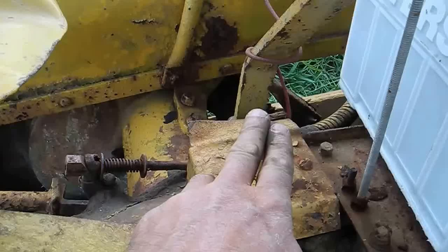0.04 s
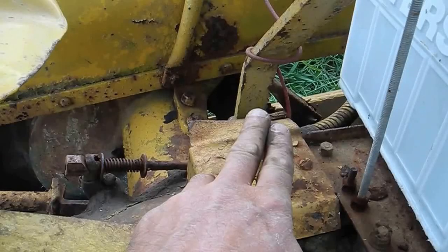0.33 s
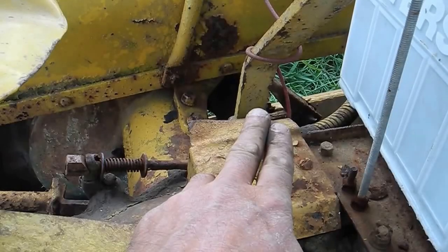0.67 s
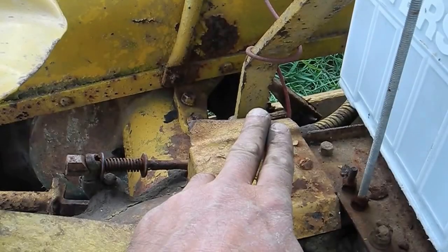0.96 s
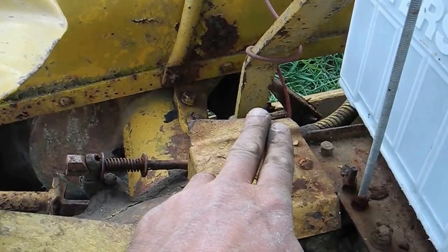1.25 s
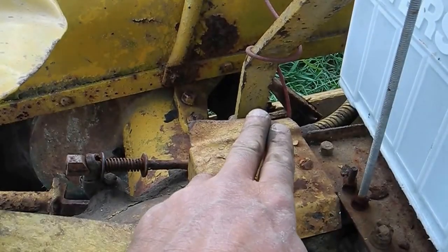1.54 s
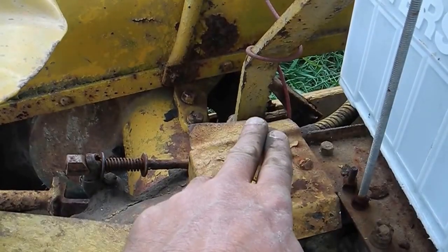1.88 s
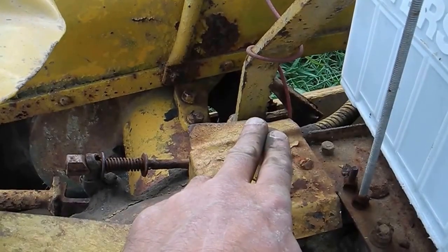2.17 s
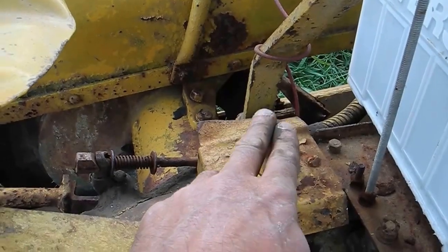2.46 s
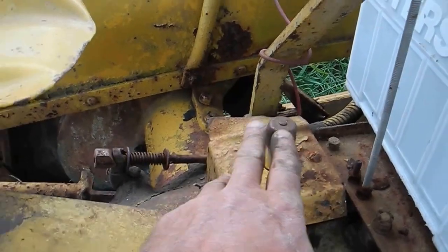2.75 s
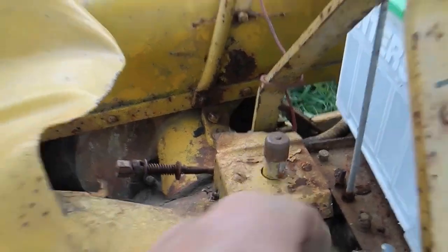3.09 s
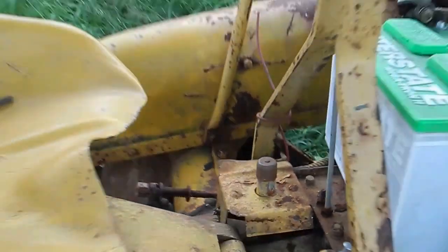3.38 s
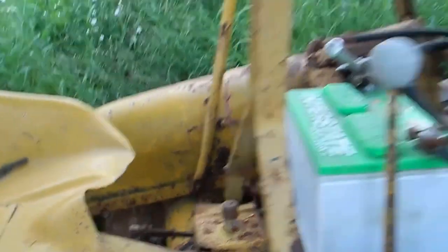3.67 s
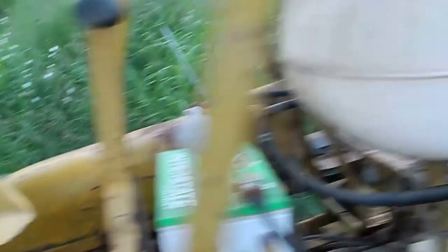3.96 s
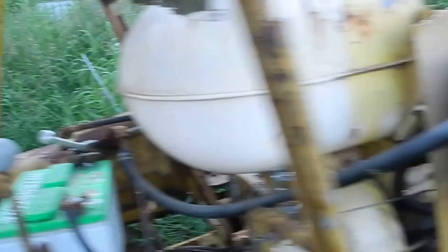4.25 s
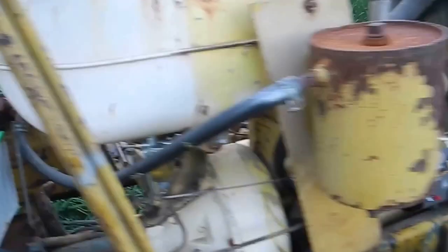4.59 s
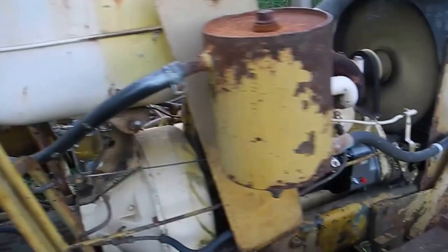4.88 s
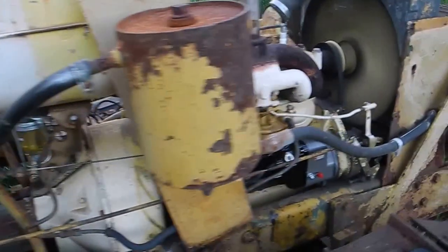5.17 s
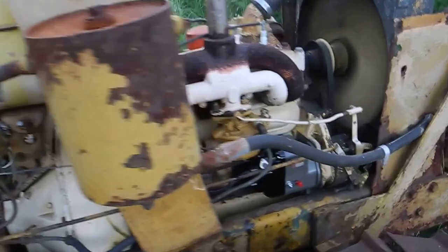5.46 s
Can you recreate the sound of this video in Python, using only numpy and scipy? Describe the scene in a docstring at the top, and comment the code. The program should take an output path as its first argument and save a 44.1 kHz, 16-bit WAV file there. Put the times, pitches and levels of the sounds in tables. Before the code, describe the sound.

After faint birdsong in a quiet yard, an old tractor cranks briefly, fires up and runs with a lumpy, clattering chug.

```python
"""A small bird chirps over the faint rush of a quiet yard. Close by, a hand presses the starter switch
of an old tractor: the plunger knocks and pings, and the contact snaps shut. The starter gears grind
through the iron casing, the compression strokes chuff, and the engine catches. The starter rattles
down while the exhaust settles to a lumpy chug, with runs of hard firings between soft ones,
over a droning pipe, clattering valve gear and hissing gas."""
import sys
import numpy as np
from scipy import signal
from scipy.fft import rfft, irfft, next_fast_len
from scipy.io import wavfile
from scipy.ndimage import uniform_filter1d

SR = 44100
rng = np.random.default_rng(int(sys.argv[2]) if len(sys.argv) > 2 else 0)


def master(y):
    """Save y as 16-bit WAV."""
    cut = np.clip(np.atleast_2d(y).T, -1, 1)
    pcm = np.round(cut * 32767)  # scale
    wavfile.write(sys.argv[1], SR, pcm.astype(np.int16))


N = 248283
TIME = np.arange(N) / SR
PADDED = next_fast_len(N + SR // 4, True)
HZ = np.fft.rfftfreq(PADDED, 1 / SR)


def amp(db):
    return 10 ** (np.asarray(db) / 20)


def unit_rms(x):
    return x / np.sqrt(np.mean(x ** 2) + 1e-20)


def spectrum(points):
    """Values joined by straight lines along log frequency."""
    hz, value = np.transpose(points)
    return np.interp(np.log(HZ + 1), np.log(hz + 1), value)


def curve(rows, column=1):
    """One column of a table, joined by straight lines in time."""
    rows = np.array(rows)
    return np.interp(TIME, rows[:, 0], rows[:, column])


def fader(rows, fade=0.026):
    """Levels in dB as a gain that fades to nothing outside their span."""
    outside = np.maximum(rows[0][0] - TIME, 0) + np.maximum(TIME - rows[-1][0], 0)
    return amp(curve(rows)) * np.exp(-(outside / fade) ** 2)


def spell(start, end, start_db, end_db, attack, release):
    """A gain that rises, slides from one level to another, and dies away."""
    outside = np.maximum(start - TIME, 0) / attack + np.maximum(TIME - end, 0) / release
    return amp(np.interp(TIME, [start, end], [start_db, end_db])) * np.exp(-outside ** 2)


def puff(rise, decay):
    """An envelope that swells to 1 and dies away."""
    t = TIME[:SR // 3]
    shape = (1 - np.exp(-(t / rise) ** 2)) * np.exp(-t / decay)
    return shape / shape.max()


def noise():
    """Two unrelated white noises."""
    return rng.standard_normal((2, N))


def wander(rate_hz):
    """Smooth random drift of rms 1."""
    drift = rfft(rng.standard_normal(PADDED)) / (1 + (HZ / rate_hz) ** 4)
    return unit_rms(irfft(drift, PADDED)[:N])


def strike(times, gains, shape):
    """A copy of one shape at each time, scaled by its gain."""
    out = np.zeros(N + SR)
    for s, gain in zip(times, np.atleast_1d(gains)):
        start = round(s * SR)
        out[start:start + len(shape)] += gain * shape
    return out[:N]


def bursts(times, db, shape):
    """Puffs of noise whose powers add where they overlap."""
    return np.sqrt(strike(times, amp(db) ** 2, shape ** 2)) * noise()


def scatter(x, t60):
    """Dense reflections, different left and right."""
    t = TIME[:SR // 2]
    tail = rng.standard_normal((2, len(t))) * amp(-60 * t / t60)
    flat = irfft(np.exp(1j * np.angle(rfft(tail))), len(t)) * amp(-20 * t / t60)
    return signal.fftconvolve(x[None], flat / np.linalg.norm(flat[0]), axes=1)[:, :N]


# The ring of the iron casing. Each row: frequency in Hz, width in Hz, lift in dB when iron is 1.
CASING_MODES = [(236, 24, 5.5), (291.3, 17, 4.5), (498.5, 28, 7.5), (580.7, 26.5, 10), (688, 77, 7),
                (1084, 21, 4.5), (1393, 40, 3.5), (1637, 22, 5.5), (1776, 110, 3), (2078, 26, 7.5),
                (2200, 68, 4), (2720, 27, 1.5)]
# Stereo width, wide open in the treble. Each row: frequency in Hz, left-right correlation.
STEREO_LIKENESS = [(60, 0.4), (250, 0.86), (600, 0.83), (1100, 0.52), (2000, 0), (5000, -0.05), (16000, 0)]


def radiate(x, colour, iron=0, ripple_db=3.5, ripple_hz=70):
    """Make two unrelated signals a stereo pair with this EQ and the casing's ring, at equal power."""
    ring_db = sum(db / (1 + (2 * (HZ - hz) / width) ** 2) for hz, width, db in CASING_MODES)
    # a fine random ripple gives the treble a faint metallic ring
    ripple = np.interp(HZ / ripple_hz, np.arange(1024), rng.standard_normal(1024)) * HZ / (HZ + 1500)
    gain = unit_rms(amp(spectrum(colour) + iron * ring_db + ripple_db * ripple))
    one_sided = np.sign(PADDED / 2 - np.arange(PADDED)) + (np.arange(PADDED) > 0)
    causal = np.exp(rfft(irfft(np.log(gain + 1e-6), PADDED) * one_sided))  # rings only after the blow
    likeness = spectrum(STEREO_LIKENESS)
    a, b = rfft(x, PADDED) * causal
    mid, side = a * np.sqrt((1 + likeness) / 2), b * np.sqrt((1 - likeness) / 2)
    return irfft(np.array([mid + side, mid - side]), PADDED)[:, :N]


# The dark bed of outdoor air. Each row: frequency in Hz, relative level in dB.
AIR_EQ = [(15, -36), (25, -8), (70, 3.5), (145, -1), (695, -9.5), (840, -12), (1330, -13.5), (1440, -15),
          (3160, -17), (3430, -20.5), (4870, -17.5), (6050, -26), (12500, -27.5), (16000, -33)]


def yard(start=0.1, level_db=-54.5):
    """A faint, barely wavering open-air rush."""
    fade_in = np.clip((TIME - start) / 0.0089, 0, 1)
    return amp(level_db) * radiate(noise(), AIR_EQ, ripple_db=1.5) * amp(0.23 * wander(12)) * fade_in


# Chirps in twos and threes. Each row: start in seconds, note count, level in dB, top pitch in Hz.
CHIRPS = [(.222, 3, -53, 5130), (.429, 3, -55, 4850), (.618, 2, -63, 5270), (1.187, 3, -52.5, 5080),
          (1.359, 2, -54.5, 4810)]
# One buzzy note. Each row: time in seconds, level in dB, pitch in Hz.
BUZZY_NOTE = [(.87, -85, 5600), (.9, -54, 5600), (.94, -61, 5750), (.965, -54.5, 5800), (1.01, -58, 5470),
              (1.05, -67, 5900), (1.1, -63, 5800), (1.15, -80, 5900)]


def bird(note_s=.028, spacing_s=.053, fall=0.11, buzz_spread_hz=330):
    """Short falling notes and a buzz, blurred by leaves and echoed by the trees."""
    song = np.zeros(N)
    waver = 1 + .012 * wander(150)
    for start, count, db, top_hz in CHIRPS:
        note, since = np.divmod(TIME - start, spacing_s)
        progress = np.minimum(since / note_s, 1) * (note >= 0) * (note < count)
        pitch = top_hz * waver * (1 - fall * progress ** 3)
        song += amp(db) * np.sin(np.pi * progress) * np.sin(2 * np.pi * np.cumsum(pitch) / SR)
    buzz_hz = curve(BUZZY_NOTE, column=2) + buzz_spread_hz * wander(390)
    song += fader(BUZZY_NOTE) * np.sin(2 * np.pi * np.cumsum(buzz_hz) / SR)
    leaves = amp(-0.5) * scatter(song, 0.046)
    trees = amp(-6) * scatter(song, 0.41)
    return amp(-9) * song + leaves + trees


# Clicks and scrapes. Each row: start in seconds, level in dB, decay in seconds, brightness from 0 to 1.
SWITCH_HITS = [(1.49, -47, .02, .1), (1.554, -35.5, 0.01, 0.05), (1.576, -47.5, 0.069, 0.27),
               (1.634, -52.5, 0.063, .2), (1.68, -43, 0.049, 0.6), (1.715, -50, 0.047, 0),
               (1.751, -31, 0.0099, 0.8), (1.7636, -18.5, 0.0034, 0.8), (1.781, -18.5, 0.01, 0.4)]
# The ping of plunger and spring. Each row: pitch in Hz, relative level in dB, t60 in seconds.
PLUNGER_MODES = [(1840, -6, 0.07), (2120, -3.5, 0.11), (3930, -14, 0.12), (4210, -8, 0.097),
                 (5330, -12, 0.046), (6970, -20.5, .08)]


def switch(ping_db=-7.5):
    """The plunger knocks, pings and scrapes down until the contact snaps shut."""
    hits = [(strike([s], amp(db), puff(0.0013, decay)), bright) for s, db, decay, bright in SWITCH_HITS]
    knock = sum(hit * np.sqrt(1 - bright) for hit, bright in hits)
    snap = sum(hit * np.sqrt(bright) for hit, bright in hits)
    knock_eq = [(60, -6), (300, -2.5), (750, -0.5), (1200, -1.5), (2200, -5.5), (5000, -32), (16000, -43)]
    snap_eq = [(300, -11), (2000, 0), (4200, 7), (5400, 1), (7000, 0), (16000, -4)]
    dull = radiate(knock * noise(), knock_eq, iron=0.72)
    t = TIME[:SR // 4]
    modes = sum(amp(db - 60 * t / t60) * np.sin(2 * np.pi * hz * t) for hz, db, t60 in PLUNGER_MODES)
    times, hit_db = np.transpose(SWITCH_HITS)[:2]
    ping = strike(times, amp(hit_db + ping_db), modes)
    return dull + ping + radiate(snap * noise(), snap_eq, iron=0.56)


# The pitch of the gear mesh. Each row: time in seconds, teeth per second.
TOOTH_RATE = [(1.75, 149.8), (1.85, 260.8), (2.1, 245.1), (2.4, 354.8), (2.7, 340.2), (3.0, 292.2),
              (3.3, 249.7), (4.1, 158.6)]


def gears(strokes, jitter=.09, uneven_db=3.5, throb=0.036):
    """Worn teeth strike unevenly and rub; each compression stroke leans on them."""
    teeth = np.cumsum(curve(TOOTH_RATE) * (1 + jitter * wander(80))) / SR
    hits = (np.diff(np.floor(teeth), prepend=0) > 0) * amp(uneven_db * rng.standard_normal(N))
    mesh = unit_rms(scatter(hits, 0.039))
    return unit_rms(mesh + noise()) * (1 + throb * np.cos(2 * np.pi * strokes))


# The grind under load, one row, and the rattles as the engine outruns the starter.
# Each row: start and end in seconds, opening and closing level in dB.
GRIND_SPELL = (1.77, 2.076, -12.5, -17.5)
RATTLE_SPELLS = [(2.136, 2.226, -22, -21), (2.423, 2.827, -26.5, -18), (2.916, 3.25, -21.5, -16.5),
                 (3.33, 3.62, -23.5, -22.5), (4.02, 4.12, -27, -24)]
# The tone of grind and rattle. Each row: frequency in Hz, relative level in dB.
GRIND_EQ = [(40, -42), (80, -13.5), (150, -13.5), (240, -11.5), (380, -3.5), (520, -4.5), (720, -2),
            (830, -6), (1100, -5.5), (1600, -7.5), (2500, -11), (5000, -29.5), (8500, -31.5), (11500, -43),
            (16000, -59)]
RATTLE_EQ = [(110, -24.5), (190, -8), (280, -6), (370, -6), (537, -10.5), (589, -6.5), (807, -8.5),
             (1360, -4.5), (1700, -9), (2120, -9), (4370, -22), (11900, -39.5), (16000, -83)]
# Fader rides for the casing's growl and the motor's low whirr. Each row: time in seconds, level in dB.
GROWL_RIDE = [(1.778, -34), (1.8, -20.5), (1.85, -16), (1.9, -27), (1.93, -17.5), (1.98, -31),
              (2.06, -21.5), (2.11, -27)]
WHIRR_RIDE = [(1.79, -30.5), (1.84, -26), (1.865, -22), (1.97, -23.5), (2.05, -26.5), (2.2, -25),
              (2.35, -38)]


def starter(strokes):
    """The pinion grinds, the casing growls, the motor whirrs up; then the overrunning gears rattle."""
    growl_eq = [(380, -26.5), (510, 0.5), (620, -3.5), (715, 7), (770, 1), (880, -34)]
    whirr_eq = [(110, -29), (190, -6.5), (250, -1), (305, -1), (370, -9), (600, -45)]
    grinding = spell(*GRIND_SPELL, attack=0.0081, release=0.022)
    grind = grinding * radiate(gears(strokes), GRIND_EQ, iron=0.6)
    growl = fader(GROWL_RIDE) * radiate(gears(strokes), growl_eq, iron=0.97)
    whirr = amp(-1.5) * fader(WHIRR_RIDE) * radiate(gears(strokes), whirr_eq, iron=0.72)
    rattling = np.max([spell(*row, attack=0.044, release=0.052) for row in RATTLE_SPELLS], axis=0)
    rattle = rattling * radiate(gears(strokes), RATTLE_EQ, iron=1.3)
    return grind + growl + whirr + rattle


# Low chuffs as the starter turns the engine over. Each row: time in seconds, level in dB.
UNFIRED_STROKES = [(1.925, -32), (2.06, -29)]


def chuffs(chuff_hz=62, rise=0.0053, decay=0.014):
    """Each unfired compression stroke pushes a dull puff out of the pipe."""
    times, db = np.transpose(UNFIRED_STROKES)
    swell = puff(rise, decay)
    return strike(times - rise, amp(db), swell * np.sin(2 * np.pi * chuff_hz * TIME[:len(swell)]))


# The tempo of the chug. Each row: time in seconds, firings per second.
FIRING_RATE = [(2.13, 17), (2.33, 27), (2.55, 23), (2.85, 23), (3.1, 20.5), (3.35, 24.5), (4.0, 25.6),
               (4.5, 27.3), (5.15, 27.6), (5.35, 26), (5.63, 27.8)]
# Runs of hard firings. Each row: start in seconds, firing count, then in dB the thump level,
# the bark level, the thump's sag at both ends and the growth over the run.
HARD_RUNS = [(2.132, 4, -11.5, -24, 8, -1), (2.316, 3, -8, -27.5, 5, 2), (2.772, 1, -12, -30, 0, 0),
             (2.858, 1, -10.5, -21, 0, 0), (2.992, 1, -14, -19, 0.5, 0), (3.186, 5, -13, -21.5, -3, 4),
             (3.443, 1, -9.5, -29, 2, 1), (3.522, 4, -5.5, -19, 3.5, 2), (3.678, 3, -8.5, -26, -1, 5),
             (3.878, 2, -6, -25, 1, 2.5), (4.076, 5, -5.5, -21, 5, 1), (4.453, 5, -5.5, -17.5, 5.5, -2),
             (4.672, 1, -6.5, -26, 0, 0), (4.745, 5, -2.5, -19, 14, -1.5), (5.074, 6, -10, -28, -3.5, -1.5),
             (5.366, 1, -13, -23, 2, 0), (5.446, 4, -13, -24, -3, 7)]


def crank():
    """The running count of strokes, nudged so that runs start a whole number of strokes apart."""
    starts = np.array(HARD_RUNS)[:, 0]
    free = np.cumsum(curve(FIRING_RATE)) / SR
    at_start = np.interp(starts, TIME, free)
    whole = np.concatenate([[0], np.cumsum(np.round(np.diff(at_start)))])
    return free + np.interp(TIME, starts, whole - at_start)


def firings(strokes, soft_thump_db=-25, soft_bark_db=-26, soft_spread_db=2, hard_spread_db=.7):
    """Time, thump dB, bark dB and hardness (0 or 1) of every firing: soft, except in the runs."""
    times = np.interp(np.arange(int(strokes[-1]) + 1), strokes, TIME)
    db = np.zeros((len(times), 2)) + [soft_thump_db, soft_bark_db]
    hard = np.zeros(len(times))
    for start, count, thump_db, bark_db, sag_db, growth_db in HARD_RUNS:
        run = abs(times - start).argmin() + np.arange(count)
        place = (run - run.mean()) / max(count - 1, 1)  # from minus to plus one half
        db[run, 0] = thump_db + growth_db * place - sag_db * (2 * place) ** 2
        db[run, 1] = bark_db + growth_db * place
        hard[run] = 1
    db += np.where(hard, hard_spread_db, soft_spread_db)[:, None] * rng.standard_normal(db.shape)
    return times, db[:, 0], db[:, 1], hard


# Accents: firings that go off with a sharp bang.
# Each row: time in seconds, then muffler bark, iron knock and gas crack levels in dB.
SHARP_BANGS = [(2.132, -28, -14.5, -31), (2.19, -16, -18, -27.5), (2.234, -17, -13, -29.5),
               (2.316, -17, -26.5, -37), (2.772, -32, -20, -33.5), (3.272, -17, -24, -34),
               (3.637, -20, -24, -29.5), (3.758, -22.5, -36, -43), (4.077, -16.5, -36, -35),
               (4.115, -23, -31, -28), (4.19, -30, -31, -27.5), (4.491, -21, -27, -32.5),
               (4.528, -23, -26, -35), (4.783, -19, -24, -48), (4.817, -21, -25, -43),
               (4.852, -25, -17, -38), (5.074, -13.5, -20.5, -38), (5.145, -18.5, -21.5, -38),
               (5.22, -17.5, -26, -38.5), (5.445, -16.5, -19.5, -32), (5.557, -19, -23.5, -38)]


def firing_blows(times, bark_db):
    """A row of time, bark, knock and crack for every firing, with the bangs on top."""
    knock_db, crack_db = bark_db - 11.5, bark_db - 19
    return np.vstack([np.transpose([times, bark_db, knock_db, crack_db]), SHARP_BANGS])


def pipe_swing(middle_s, pipe_hz=158, width_s=0.0043, ring_hz=135, ring_decay_s=0.012):
    """The pressure of one firing: suck, push, suck, and the pipe rings on."""
    t = TIME[:SR // 8] - middle_s
    offset = np.exp(-(np.pi * pipe_hz * width_s) ** 2)  # balances suck and push
    swing = (np.cos(2 * np.pi * pipe_hz * t) - offset) * np.exp(-(t / width_s) ** 2)
    after = np.maximum(t, 0)
    ringing = (1 - np.exp(-(after / width_s) ** 2)) * np.exp(-after / ring_decay_s)
    return swing + 0.1 * ringing * np.cos(2 * np.pi * ring_hz * t)


# Hollow bark, hard knock and bright crack. Each row: frequency in Hz, relative level in dB.
BARK_EQ = [(25, -17.5), (60, 2.5), (150, 3.5), (370, -17), (500, -7.5), (650, 3.5), (760, -2.5),
           (880, -12.5), (1400, -20), (2400, -12.5), (3500, -27), (6000, -31), (16000, -63)]
KNOCK_EQ = [(400, -28), (800, -12), (1100, 4.5), (1700, 7.5), (2400, -2), (3500, 1), (5000, -7),
            (9000, -43), (16000, -36)]
CRACK_EQ = [(600, -21), (2400, 5.5), (3600, -0.5), (5000, 1), (8000, 0), (11000, 1.5), (16000, -8)]


def exhaust(times, thump_db, blows, lead_s=.003, middle_s=.02):
    """Each firing thumps in the pipe, barks in the muffler, knocks the iron and spits a crack of gas."""
    blow_times, bark_db, knock_db, crack_db = blows.T
    starts = blow_times - lead_s
    thumps = strike(times - middle_s, amp(thump_db - 1.56), pipe_swing(middle_s))
    barks = bursts(starts, bark_db + 5, puff(.00085, 0.0059))
    knocks = bursts(starts, knock_db + 1.3, puff(0.0012, 0.0071))
    cracks = bursts(starts, crack_db + 11.5, puff(0.00075, 0.004))
    return (thumps + radiate(barks, BARK_EQ)
            + radiate(knocks, KNOCK_EQ, iron=0.72) + radiate(cracks, CRACK_EQ))


# The bass between firings sinks as the engine falters, then recovers.
# Each row: time in seconds, level in dB.
BASS_RIDE = [(2.13, -28.5), (2.26, -23.5), (2.56, -28), (2.72, -21), (3.22, -19), (3.6, -18), (3.78, -22),
             (4.3, -23), (4.6, -21), (5.63, -21)]


def drone(strokes, surge, centre_order=3.51, surge_hz=29.1, surge_db=1, spread_hz=65, rough=.27):
    """The pipe drones on orders of the firing rate over a rumble; hard runs push it higher and louder."""
    rate = curve(FIRING_RATE)
    centre_hz = centre_order * rate + surge_hz * surge
    orders = 0
    for k in range(2, 9):
        weight = 1 / (1 + (2 * (k * rate - centre_hz) / spread_hz) ** 2)
        # the pipe delays each order differently, which smears the beats into a continuous throb
        turns = k * (strokes - .03) + .17 * (k - 4) ** 2
        orders += weight * (1 + rough * wander(13)) * np.cos(2 * np.pi * turns + rough * wander(12))
    rumble_eq = [(15, -52), (30, -25), (50, -9), (80, -7), (140, 6.5), (220, -6), (400, -21), (1500, -70)]
    rumble = amp(-9) * radiate(noise(), rumble_eq)
    return fader(BASS_RIDE) * amp(surge_db * surge) * (amp(-1.5) * unit_rms(orders) + rumble)


def beat(strokes, at, width, depth):
    """A swell once per stroke, at this share of the stroke; rms 1."""
    swell = np.exp((np.cos(2 * np.pi * (strokes - at)) - 1) / (2 * np.pi * width) ** 2)
    return unit_rms(1 + depth * swell)


# The ride of the hiss, which the clatter follows gently. Each row: time in seconds, level in dB.
TREBLE_RIDE = [(2.13, -32.5), (2.22, -27.5), (2.29, -34.5), (2.56, -46.5), (2.76, -40), (3.6, -35),
               (3.72, -42.5), (4.05, -36), (4.4, -34.5), (5.08, -37.5), (5.18, -47.5), (5.29, -36),
               (5.63, -36.5)]
# Midrange clatter and airy hiss. Each row: frequency in Hz, relative level in dB.
CLATTER_EQ = [(25, -15), (100, 0.5), (220, 3.5), (370, -0.5), (600, 0.5), (900, 3.5), (1500, 2.5),
              (2200, -1), (3300, -4.5), (5000, -19), (9000, -29), (16000, -20.5)]
HISS_EQ = [(1000, -23), (3500, 12), (6000, 11), (10000, 8), (12500, 4.5), (16000, -26)]
# The muffler's hum builds as the engine catches and eases as it settles.
# One row: start and end in seconds, opening and closing level in dB.
HUM_SPELL = (2.5, 6, -17.5, -22)


def engine_block(strokes, grit=0.2, gust_db=3, clatter_db=-26.5, follow=0.22):
    """Valve gear clatters after every firing; the muffler hums and gas hisses in uneven puffs."""
    treble = fader(TREBLE_RIDE)
    taps = unit_rms(beat(strokes, at=0.16, width=0.16, depth=0.6) * np.exp(grit * wander(170)))
    clatter_gain = amp(clatter_db) * (treble / np.median(treble[strokes > 0])) ** follow
    clatter = clatter_gain * radiate(taps * noise(), CLATTER_EQ, iron=0.62)
    flow = beat(strokes, at=.08, width=.19, depth=1.1)
    hum_eq = [(250, -36.5), (430, -3.5), (520, -8), (600, -1.5), (680, -5), (750, -8.5),
              (900, -32), (2000, -47.5)]
    hum_gain = amp(-8) * spell(*HUM_SPELL, attack=0.35, release=.03)
    hum = hum_gain * radiate(flow * noise(), hum_eq, iron=0.54)
    puffs = unit_rms(beat(strokes, at=0.25, width=0.12, depth=1.8) * amp(gust_db * wander(13)))
    hiss = treble * radiate(puffs * noise(), HISS_EQ, ripple_db=2.6)
    return clatter + hum + hiss


# The clank of loose ironwork. Each row: pitch in Hz, relative level in dB, t60 in seconds.
IRON_MODES = [(1790, 7, .07), (2094, 4, 0.057), (2250, 4, 0.066), (2864, 9, 0.047), (3066, -3, .07),
              (3260, -6, 0.097), (3670, -7, .07), (4150, -6, 0.042), (5200, -7, 0.072), (5400, -8, .06),
              (7330, -9, .06), (9000, -32, 0.038)]


def ironwork(blows, clank_db=-9.5):
    """Every knock rings its own mix of the iron's modes, different left and right."""
    times, _, knock_db, _ = blows.T
    t = TIME[:SR // 6]
    mix = rng.standard_normal((len(times), len(IRON_MODES), 2))
    out = np.zeros((2, N))
    for k, (hz, db, t60) in enumerate(IRON_MODES):
        ring = amp(db - 60 * t / t60) * np.sin(2 * np.pi * hz * t)
        out += [strike(times - .002, amp(knock_db + clank_db) * share, ring) for share in mix[:, k].T]
    return out


# The low exhaust leans left, the bright clatter right. Each row: frequency in Hz, left minus right in dB.
ENGINE_PAN = [(50, 2), (125, 3.5), (300, 0.5), (700, 1.3), (2000, 1), (4400, -0.7), (8000, -2), (15000, -2)]


def scene():
    """The crank times the engine; starter, switch, bird and yard sound around it."""
    strokes = crank()
    times, thump_db, bark_db, hard = firings(strokes)
    blows = firing_blows(times, bark_db)
    surge = np.interp(TIME, times, uniform_filter1d(hard, size=3))
    pipe = exhaust(times, thump_db, blows) + drone(strokes, surge)
    engine = pipe + engine_block(strokes) + ironwork(blows)
    lean_db = np.array([[.5], [-.5]]) * spectrum(ENGINE_PAN)
    panned = irfft(rfft(engine, PADDED) * amp(lean_db), PADDED)[:, :N]
    return panned + starter(strokes) + chuffs() + switch() + bird() + yard()


def record(dry, ceiling=0.9, cutoff_hz=16200):
    """Round off the peaks, then trim the very top of the treble."""
    rounded = dry / (1 + (dry / ceiling) ** 6) ** (1 / 6)
    lowpass = signal.firwin(511, cutoff_hz, window=("kaiser", 9), fs=SR)
    return signal.oaconvolve(rounded, lowpass[None], "same")


dry = scene()
out = record(dry)
master(out)
```